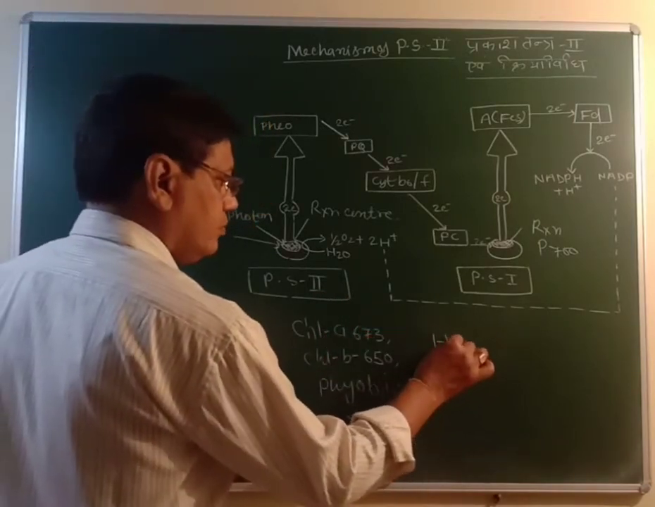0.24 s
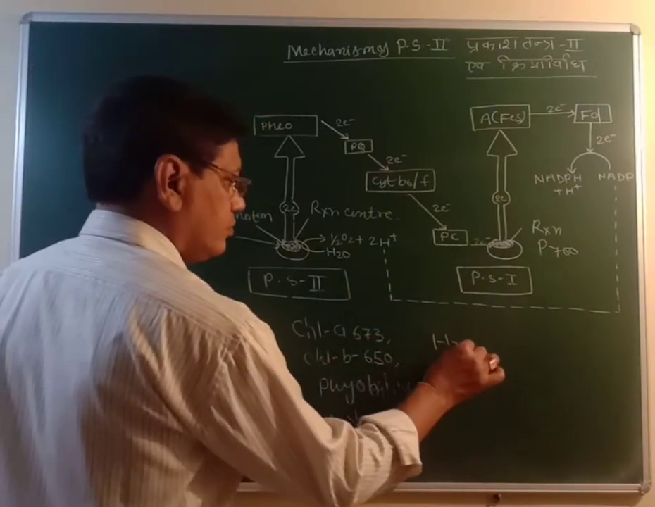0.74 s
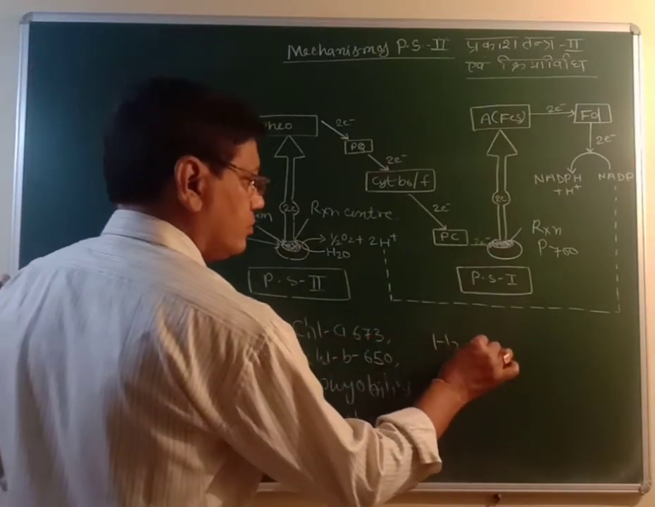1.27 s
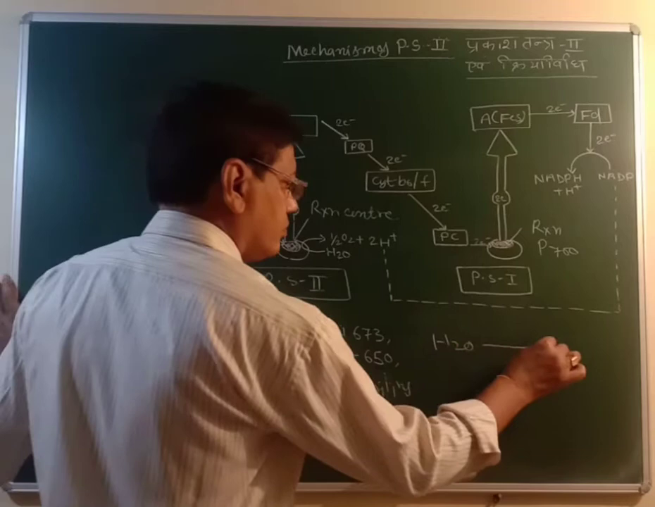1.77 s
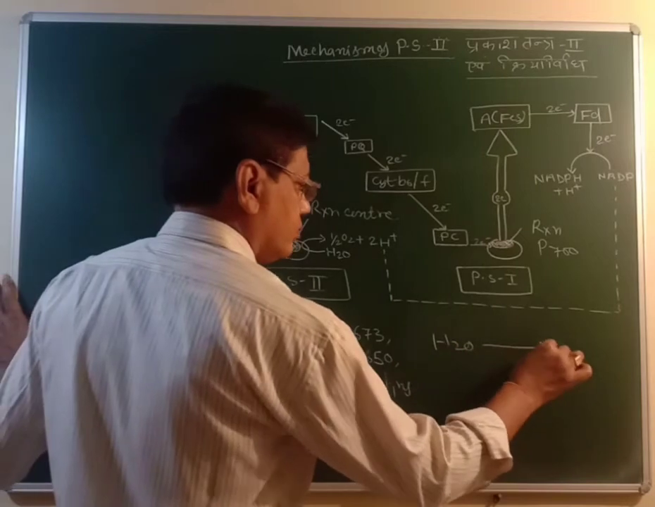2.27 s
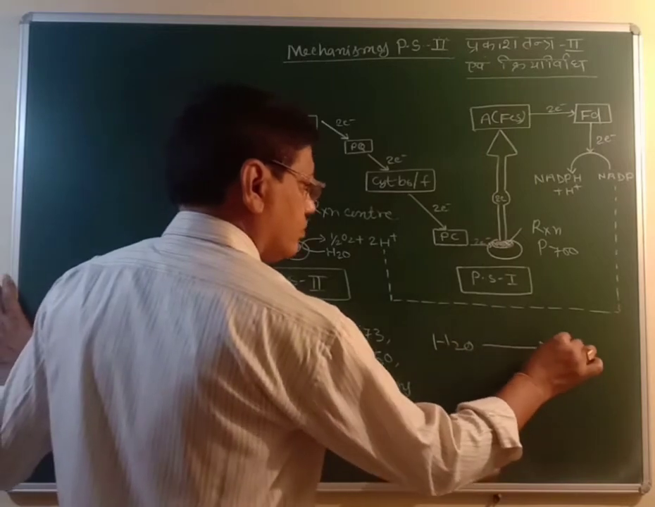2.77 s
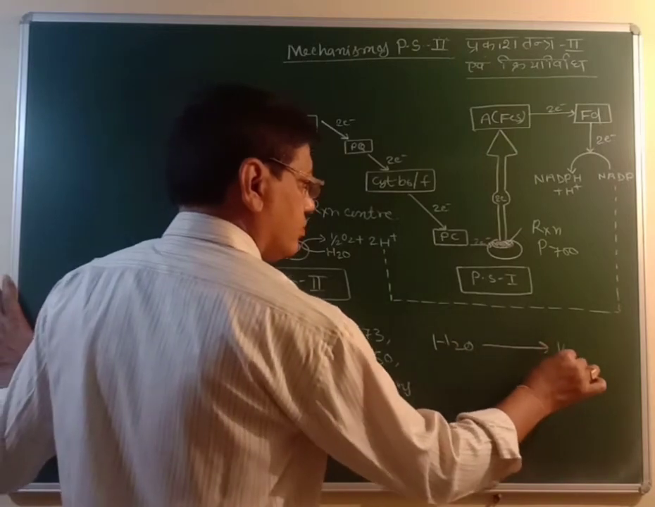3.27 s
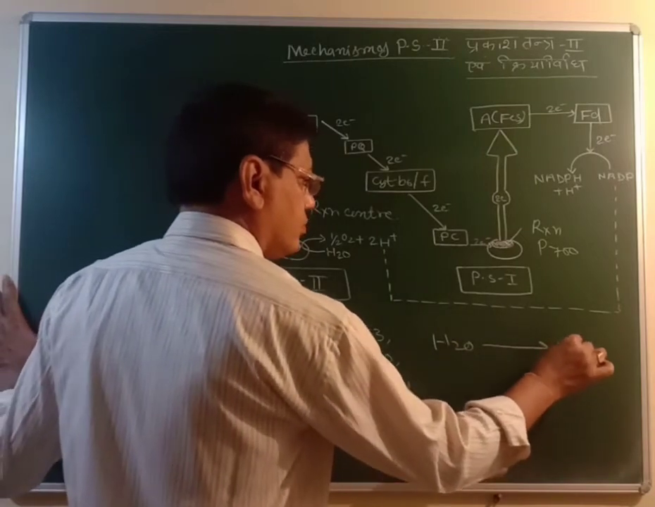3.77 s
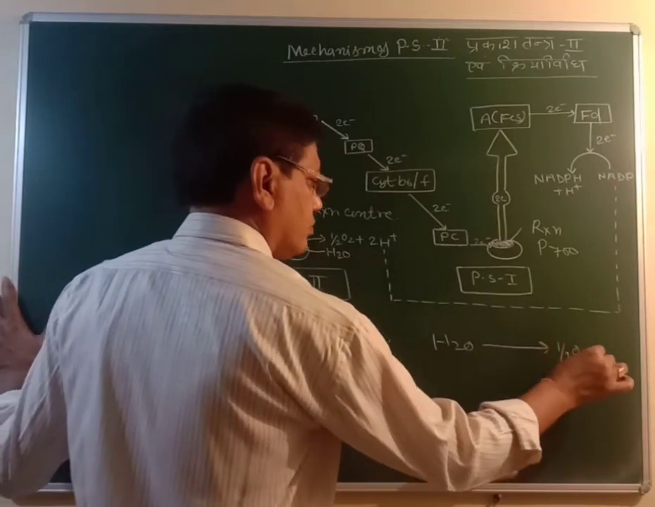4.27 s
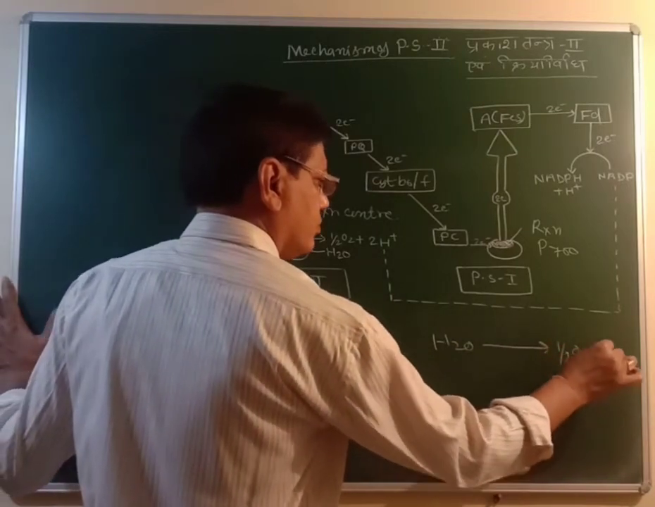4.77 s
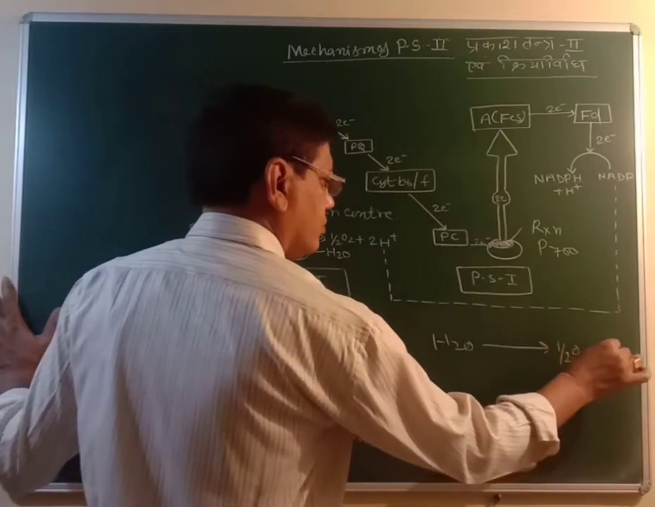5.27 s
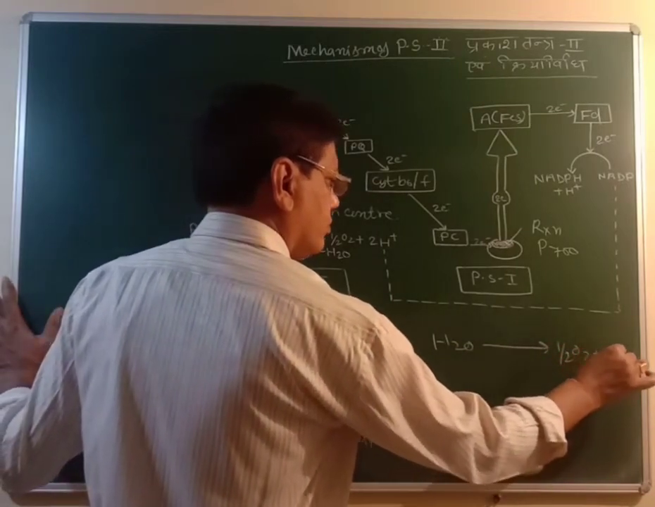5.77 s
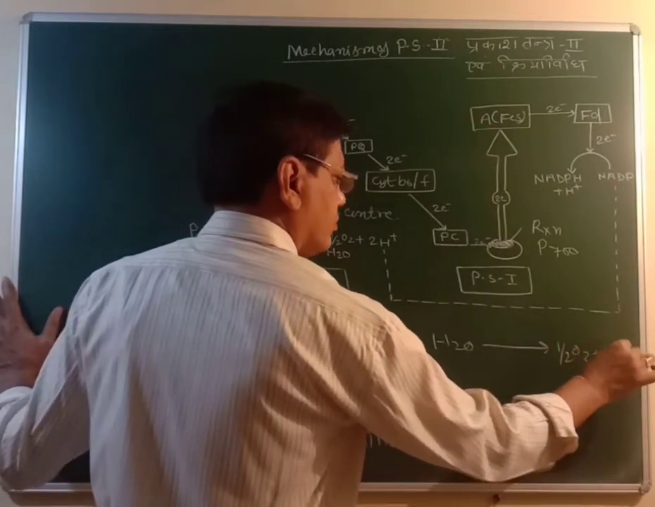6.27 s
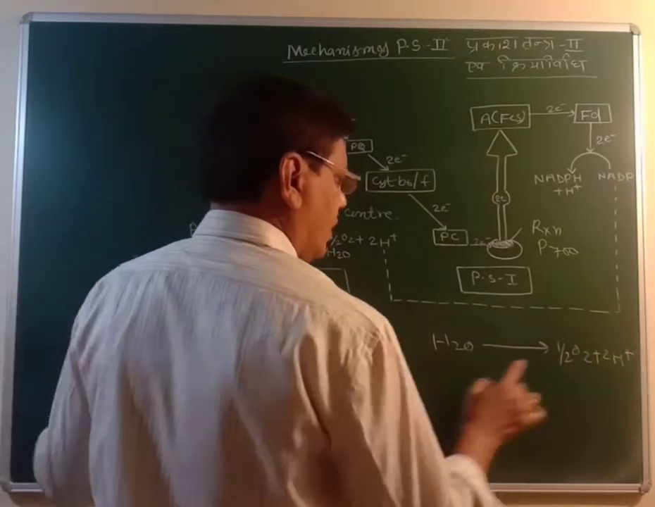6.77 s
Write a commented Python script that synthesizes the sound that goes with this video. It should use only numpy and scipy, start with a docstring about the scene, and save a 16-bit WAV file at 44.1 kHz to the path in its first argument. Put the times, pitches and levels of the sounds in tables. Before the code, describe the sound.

Chalk taps and short gritty scrapes on a hollow-sounding board at an uneven pace in a small bare room, ending with a cloth rustle and shuffle.

```python
"""Chalk on a classroom board

Chalk writes a short formula on a wall board in a small, bare classroom, over still air and faint hiss.
Taps excite a modal ring of board and room, plus airborne clicks; strokes are showers of tiny slips.
One curve judders as a slip train near the drum mode. The hand leans on the board late in the writing.
At the end the writer steps back: a shirt rustles and feet shuffle, both as filtered slip showers."""
import sys
import numpy as np
from scipy import signal
from scipy.fft import irfft
from scipy.io import wavfile
from scipy.ndimage import uniform_filter1d

SR = 44100
rng = np.random.default_rng(int(sys.argv[2]) if len(sys.argv) > 2 else 0)


def persist_wave(psi):
    """Save psi, clipped to +-1, as 16-bit WAV."""
    counts = np.round(np.clip(psi, -1, 1) * 32767).astype(np.int16)
    wavfile.write(sys.argv[1], SR, np.atleast_2d(counts).T)


N = 310419
HZ = np.fft.rfftfreq(8192, 1 / SR)  # filter grid
T = np.arange(SR * 3 // 4) / SR  # time axis of one ring [s]


def amp(db):
    """Decibels to gain."""
    return 10 ** (np.asarray(db) / 20)


def unit(x):
    """Scales to an rms of one."""
    return x / np.sqrt(np.mean(x ** 2) + 1e-20)


def read(points, hz):
    """Interpolates a table on a log-frequency axis."""
    point_hz, value = np.transpose(points)
    return np.interp(np.log(hz + 1), np.log(point_hz), value)


def humps(modes, hz):
    """Summed lift in dB of a set of resonances."""
    return sum(lift_db / (1 + (2 * (hz - mode_hz) / width_hz) ** 2) for mode_hz, width_hz, lift_db in modes)


def below(corner_hz, order=6):
    """Weight of a shelf: one under the corner, falling to zero above."""
    return 1 / (1 + (HZ / corner_hz) ** order)


def colour(x, db):
    """Causal minimum-phase filter with the given gain at each frequency of HZ."""
    log_gain = np.log(amp(np.r_[db, db[-2:0:-1]]))
    spectrum = np.exp(np.conj(signal.hilbert(log_gain)))
    impulse = np.fft.ifft(spectrum).real[:len(HZ)]
    return signal.fftconvolve(x, impulse)[:len(x)]


def add(mix, time_s, sound):
    """Mixes a sound in at the given time."""
    part = mix[max(round(time_s * SR), 0):][:len(sound)]
    part += sound[:len(part)]


# room air spectrum: (frequency [Hz], gain [dB])
AIR_COLOUR = [(25, -23.5), (60, -5.5), (130, 5.5), (220, -5.5), (340, -4.5), (700, -12), (1100, -14.5),
              (2000, -19.5), (4500, -23), (7500, -31), (9500, -30.5), (15300, -35)]
# hiss spectrum of each microphone: (frequency [Hz], gain [dB])
HISS_COLOUR = [(30, -3), (120, -2), (300, 1), (1000, -1.5), (3000, -4.5), (6000, -3.5), (8000, -20),
               (13000, -14.5), (15300, -5.5)]
AIR_DB, HISS_DB = -70, -74


def quiet():
    """Still air of the room, the same at both microphones, and their separate hiss."""
    air = unit(colour(rng.standard_normal(N), read(AIR_COLOUR, HZ)))
    hiss = np.array([unit(colour(rng.standard_normal(N), read(HISS_COLOUR, HZ))) for _ in range(2)])
    return amp(AIR_DB) * air + amp(HISS_DB) * hiss


# modes of the board in its frame: (frequency [Hz], width [Hz], lift [dB])
BOARD_MODES = [(158.4, 30, 7), (253, 23, 2.5), (336.8, 17, 9.5), (511.7, 12, 11.5), (617, 16, 8.5),
               (730, 23, 3.5), (784, 26, 4.5), (1067, 74, 1.5), (1175, 7.2, 6.5), (1265.6, 9.8, 7.5),
               (1670, 17, -0.5), (1733, 20, 0.5), (1902, 23, 8), (2324, 22, 9.5), (2500, 120, 3),
               (2700, 29, -0.5), (2800, 22, -7), (3110, 17, -6), (3300, 9.6, 6), (3340, 54, 2.5),
               (4100, 100, 3.5), (4380, 34, -3.5), (4380, 99, 6.5)]
# decay of board and room: (frequency [Hz], t60 [s])
RING_T60 = [(100, 0.42), (260, 0.37), (700, 0.33), (1840, 0.34), (4850, 0.32), (10000, 0.28)]


def ring(bloom_s=0.006, bloom_hz=600):
    """Dense ringing of board and room: the treble is there at once, the bass swells and lasts."""
    hz = np.fft.rfftfreq(len(T), 1 / SR)
    random_phase = np.exp(2j * np.pi * rng.random(len(hz)))
    waves = irfft(random_phase * amp(humps(BOARD_MODES, hz)), len(T))
    f, t, z = signal.stft(waves, SR, nperseg=256)
    fade = amp(-60 * t / read(RING_T60, f)[:, None])
    swell = 1 - np.exp(-t / bloom_s) / (1 + (f[:, None] / bloom_hz) ** 2)
    tail = signal.istft(z * fade * swell, SR, nperseg=256)[1][:len(T)]
    return tail / np.linalg.norm(tail)


def response(common, alike=0.34):
    """Ringing from one spot of the board: partly like every other spot, partly its own."""
    alike = np.clip(alike, 0, 1)
    return np.sqrt(alike) * common + np.sqrt(1 - alike) * ring()


# writing moves steadily towards the right edge of the frame
START_FROM_FRAME_M, WRITING_M_PER_S = 0.45, 0.056
# drum mode: stronger further from the frame
DRUM_AT_FRAME_DB, DRUM_DB_PER_M = -4, 18.5
# knock mode: bellies and nodes along the line
KNOCK_SWING_DB, KNOCK_BELLY_M, KNOCK_SPACING_M = 2.5, 0.13, 0.24


def drum(time_s, drum_hz=335, drum_width_hz=110, knock_hz=1255, knock_width_hz=120):
    """Lift in dB of the board's two main modes at the spot where the chalk is."""
    from_frame_m = START_FROM_FRAME_M - WRITING_M_PER_S * time_s
    drum_db = DRUM_AT_FRAME_DB + DRUM_DB_PER_M * from_frame_m
    knock_db = KNOCK_SWING_DB * np.cos(2 * np.pi * (from_frame_m - KNOCK_BELLY_M) / KNOCK_SPACING_M)
    return humps([(drum_hz, drum_width_hz, drum_db), (knock_hz, knock_width_hz, knock_db)], HZ)


def streaks(x, depth_db):
    """A moving contact crosses nodes and bellies of the modes, so narrow bands come and go."""
    z = signal.stft(x, nperseg=512)[2]
    patches = uniform_filter1d(rng.standard_normal(z.shape), size=3, axis=0)
    patches = uniform_filter1d(patches, size=7, axis=1)
    return signal.istft(z * amp(depth_db * unit(patches)), nperseg=512)[1][:len(x)]


# speed arch: symmetric at this length, earlier peak in a flick, later in a long line
EVEN_STROKE_S, LATE_PEAK_EXPONENT = 0.22, 0.41


def arch(n):
    """Speed of the movement over n samples: one rise and fall."""
    lateness = (n / SR / EVEN_STROKE_S) ** LATE_PEAK_EXPONENT
    return np.sin(np.pi * np.linspace(0, 1, n) ** lateness).clip(0) ** 0.7


# rubbing sustains the narrow core of the knock mode: (frequency [Hz], width [Hz], lift [dB])
SINGING_MODES = [(1261, 21, 5)]


def rub(common, rows, spectrum, body_hz, grains_per_s, spread_db, catch_db,
        on_board=False, catch_s=0.006, direct=0.67):
    """Sliding contact: a shower of tiny slips that follows the speed and catches unevenly."""
    out = np.zeros(N)
    for time_s, length_s, level_db, body_db in rows:
        n = int(np.clip(length_s * SR, 3, len(T)))
        size = rng.exponential(1, len(T))
        sign = rng.choice([-1, 1], len(T))
        happens = rng.random(len(T)) < grains_per_s / SR
        grip = uniform_filter1d(rng.standard_normal(len(T)), max(round(catch_s * SR), 1))
        slip_db = spread_db * np.minimum(size, 4) + catch_db * unit(grip)
        slips = sign * amp(slip_db) * happens
        if on_board:
            slips = colour(streaks(slips, depth_db=3.0), drum(time_s) + humps(SINGING_MODES, HZ))
        speed = arch(n)
        path = response(common)
        path[0] += direct
        sound = signal.fftconvolve(slips[:n] * speed, path)
        sound = colour(sound, read(spectrum, HZ) + body_db * below(body_hz, order=10))
        sound /= np.linalg.norm(sound) + 1e-12
        add(out, time_s, amp(level_db) * np.linalg.norm(speed) * sound)
    return out


# chalk landings: (time [s], level before TAP_GAIN_DB [dB], thud: weight of the hand [dB], skid [0-1],
# level of the drag that follows [dB])
TAPS = [(.191, -31, 4.5, 0.6, -59), (1.1209, -38.5, 3, 0.28, -67), (2.3819, -32.5, 3.5, 0.76, -55.5),
        (2.7282, -34, 1.5, 1, -47), (3.086, -29.5, -0.5, 0.85, -55), (3.4126, -51, -7, 0.6, -62),
        (3.9608, -34, -4, 0, -55), (4.3375, -36.5, -.5, 0, -52), (4.6188, -32.5, 8, 0, -71),
        (4.8266, -36.5, -5, 0, -67), (5.2565, -46, -6, 0.4, -56), (6.0202, -35, 3, 0.93, -54),
        (6.2812, -34, 9.5, 0.9, -72)]
DRAG_LAG_S, DRAG_S, DRAG_BODY_DB = 0.075, 0.1, -2.5


def drags():
    """After landing, the tip sets off on a short stroke."""
    return [(time_s + DRAG_LAG_S, DRAG_S, drag_db, DRAG_BODY_DB) for time_s, _, _, _, drag_db in TAPS]


# chalk already down: (time [s], length [s], level [dB], body: drive of the board under 2320 Hz [dB])
STROKES = [(0, 0.032, -45.5, 10), (0.419, 0.16, -54.5, 7), (0.601, 0.33, -57.5, 3), (1.341, 0.43, -49, 0.5),
           (1.816, 0.12, -56.5, -10), (1.989, 0.14, -55, -16), (2.154, 0.076, -63.5, 1.5),
           (3.298, 0.1, -53, 4), (3.472, 0.33, -59, 1), (4.179, 0.097, -56, 2), (4.967, .13, -58, -2.5),
           (5.116, 0.083, -55.5, -4), (5.461, 0.099, -58.5, -1), (5.566, .12, -57.5, 2),
           (5.76, 0.099, -57, -11)]
# scrape spectrum: (frequency [Hz], gain [dB])
SCRAPE_COLOUR = [(60, -27), (220, -12.5), (350, -1), (620, -8.5), (820, -5), (1400, -0.5), (2000, 2.5),
                 (3200, 5.5), (5000, -0.5), (7500, -6.5), (9000, -31.5), (12000, -33.5), (15500, -28.5)]


def strokes(common):
    """Gritty chalk slips drive the board as the tip slides."""
    return rub(common, STROKES + drags(), SCRAPE_COLOUR, body_hz=2320, grains_per_s=3200,
               spread_db=3.0, catch_db=1.6, on_board=True)


def click(click_hz=3900, half_s=0.00026, crack_hz=9000, crack=1.0):
    """Snap of the tip through the air: barely two cycles, with a thin crack on top."""
    t = np.arange(-24, 25) / SR
    wave = np.sin(2 * np.pi * click_hz * t) + crack * np.sin(2 * np.pi * crack_hz * t)
    wave *= np.exp(-(t / half_s) ** 2)
    return wave / np.linalg.norm(wave)


# tap spectrum: (frequency [Hz], gain [dB])
TAP_COLOUR = [(40, -45), (110, -15.5), (210, -19), (330, -8.5), (800, -2.5), (1500, 2), (2700, 4.5),
              (4200, -2.5), (6000, -7.5), (7600, -16.5), (9000, -37), (12000, -49), (15500, -45.5)]


def tap(common, time_s, thud_db, tilt_db_per_octave, skid, snap=0.3, echo=0.64, flight_s=0.0025,
        echo_s=0.00125, skid_s=0.0041, rise_s=0.00051, count=4):
    """Bending waves outrun the snap in the air; a slanting tip skids and splits the snap into several."""
    blow = response(common) * (1 - np.exp(-T / rise_s))
    skid = np.clip(skid, 0, 1)
    add(blow, flight_s, snap * (1 - skid / 2) * click())
    add(blow, flight_s + echo_s, snap * echo * (1 - skid) * click())
    jitters, signs = rng.random(count), rng.choice([-1, 1], count)
    for k, (jitter, sign) in enumerate(zip(jitters, signs)):
        add(blow, flight_s + skid_s * (k + jitter) / count, snap * skid * sign * click() / 2)
    octaves = np.log2(1 + (np.minimum(HZ, 8000) / 1500) ** 2) / 2  # a soft blow loses treble
    gain_db = read(TAP_COLOUR, HZ) + drum(time_s) + thud_db * below(490) + tilt_db_per_octave * octaves
    return unit(colour(blow, gain_db))


TAP_GAIN_DB = -9.5
# brightness: flat at FIRM_DB; tilt in dB per octave for each dB of level
FIRM_DB, TILT_PER_DB, MAX_TILT_DB_PER_OCTAVE = -34.5, 0.82, 2.64
# dull push of the hand's weight; its level follows the thud
PUSH_LAG_S, PUSH_DB, PUSH_DB_PER_THUD_DB = 0.029, -21, 1.43
PUSH_THUD_DB, PUSH_TILT_DB_PER_OCTAVE = 7.5, -10


def taps(common):
    """Every landing: the tip strikes, brighter when harder, and the hand's weight follows."""
    out = np.zeros(N)
    for time_s, level_db, thud_db, skid, _ in TAPS:
        tilt = min(TILT_PER_DB * (level_db - FIRM_DB), MAX_TILT_DB_PER_OCTAVE)
        strike_db = level_db + TAP_GAIN_DB
        add(out, time_s, amp(strike_db) * tap(common, time_s, thud_db, tilt, skid))
        push = tap(common, time_s, PUSH_THUD_DB, PUSH_TILT_DB_PER_OCTAVE, skid)
        push_db = strike_db + PUSH_DB + PUSH_DB_PER_THUD_DB * thud_db
        add(out, time_s + PUSH_LAG_S, amp(push_db) * push)
    return out


# juddering curve: (time [s], length [s], pitch [Hz], level [dB])
JUDDER = (0.38, .1, 332.5, -60.5)


def judder(common, unevenness=0.16, width_hz=120, lift_db=40, dull_db=40):
    """The chalk sticks and slips unevenly, nearly in step with the board, which drones briefly."""
    time_s, length_s, pitch_hz, level_db = JUDDER
    out = np.zeros(N)
    speed = arch(round(length_s * SR))
    wander = unit(uniform_filter1d(rng.standard_normal(len(T)), size=300))[:len(speed)]
    turns = np.cumsum(pitch_hz * (1 + unevenness * wander)) / SR
    slips = np.diff(np.floor(turns), prepend=0) * speed  # one slip per turn
    gain_db = humps([(pitch_hz, width_hz, lift_db)], HZ) + dull_db * below(2 * pitch_hz)
    sound = colour(signal.fftconvolve(slips, common), gain_db)
    sound /= np.linalg.norm(sound)
    add(out, time_s, amp(level_db) * np.linalg.norm(speed) * sound)
    return out


# hand leaning on the board, then feet and body shifting:
# (time [s], length [s], level [dB], body under 250 Hz [dB])
LEANS_AND_SHUFFLES = [(4.952, 0.04, -68, 32), (5.122, 0.093, -62, 25), (6.655, 0.1, -59.5, -2.5),
                      (6.822, 0.058, -60, -7), (6.88, 0.053, -57, 22), (6.94, 0.22, -60.5, 20)]
# spectrum of both: (frequency [Hz], gain [dB])
SHUFFLE_COLOUR = [(30, -36), (90, 4), (150, 1), (230, -3), (350, -3), (620, -8.5), (900, -17.5),
                  (1400, -18.5), (3000, -48)]


def leans_and_shuffles(common):
    """Hand, feet and body shift as sparse, low-pitched slips."""
    return rub(common, LEANS_AND_SHUFFLES, SHUFFLE_COLOUR, body_hz=250, grains_per_s=1500,
               spread_db=2, catch_db=2)


# shirt cloth sliding: (time [s], length [s], level [dB], body under 3840 Hz [dB])
RUSTLES = [(6.526, 0.037, -56.5, -38), (6.637, 0.068, -66, -4.5), (6.733, 0.19, -67.5, 8.5),
           (6.877, 0.11, -49.5, 11)]
# cloth spectrum: (frequency [Hz], gain [dB])
CLOTH_COLOUR = [(200, -29), (900, -40.5), (1300, -16.5), (3000, -11.5), (5500, 6.5), (7500, 0.5),
                (9500, -15.5), (13000, -22.5), (15300, -9)]


def shirt(common):
    """Cloth slides as a dense shower of fine slips."""
    return rub(common, RUSTLES, CLOTH_COLOUR, body_hz=3840, grains_per_s=9800, spread_db=1.5, catch_db=-1.0)


def scene():
    """Chalk, writer's movements and quiet, sharing one common ring."""
    common = ring()
    chalk = strokes(common) + taps(common) + judder(common)
    writer = leans_and_shuffles(common) + shirt(common)
    return quiet() + chalk + writer


# microphone housing: (frequency [Hz], width [Hz], lift [dB])
HOUSING_MODES = [(1248.4, 100, 7.5), (6590, 110, -19)]
EDGE_HZ = 15600


def record(dry):
    """Resonances of the microphone housing, then the band limit."""
    heard = np.array([colour(channel, humps(HOUSING_MODES, HZ)) for channel in dry])
    low_pass = signal.firwin(511, EDGE_HZ, window=("kaiser", 9), fs=SR)
    return signal.oaconvolve(heard, low_pass[None], "same")


dry = scene()
out = record(dry)
persist_wave(out)
```